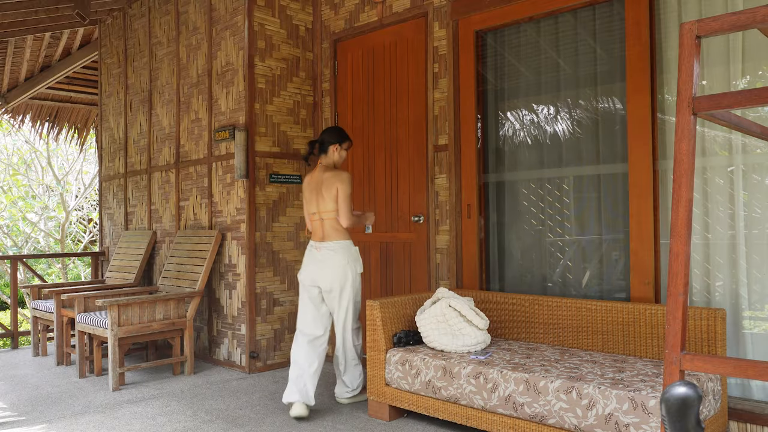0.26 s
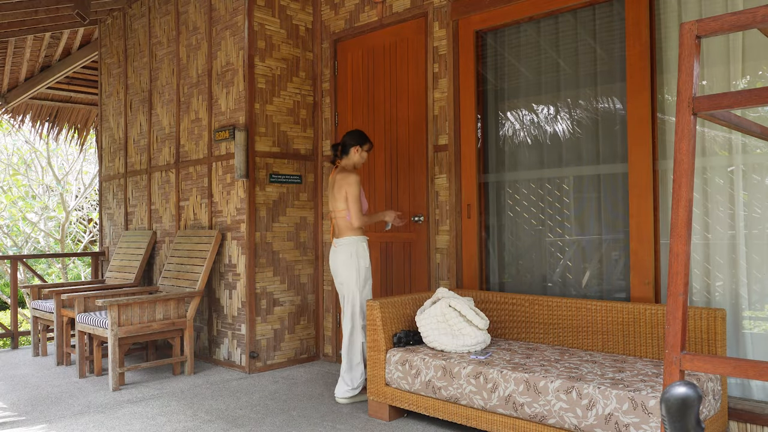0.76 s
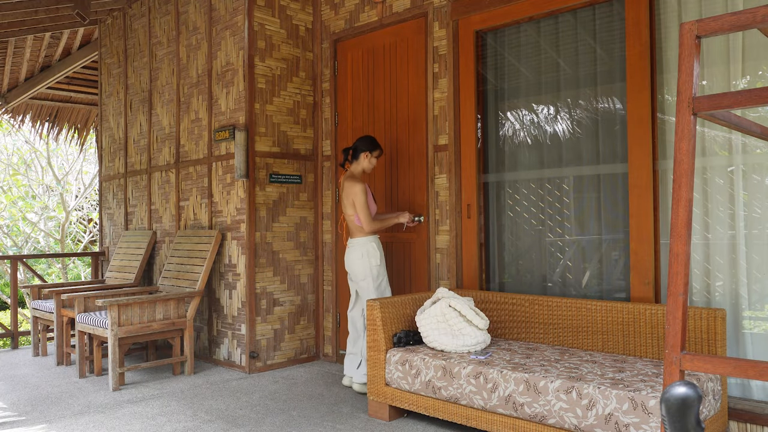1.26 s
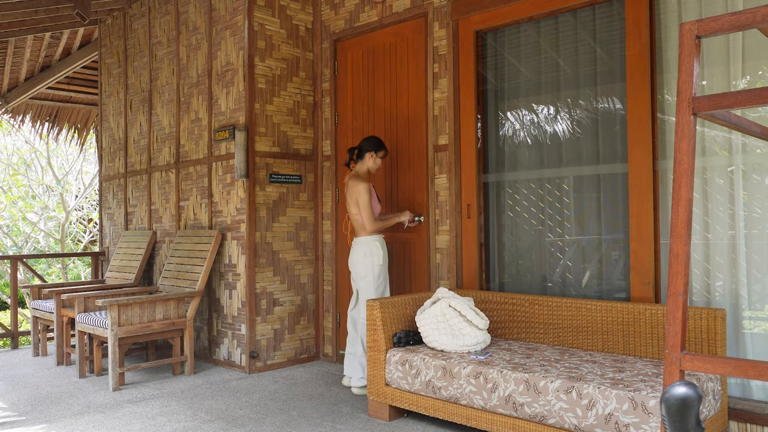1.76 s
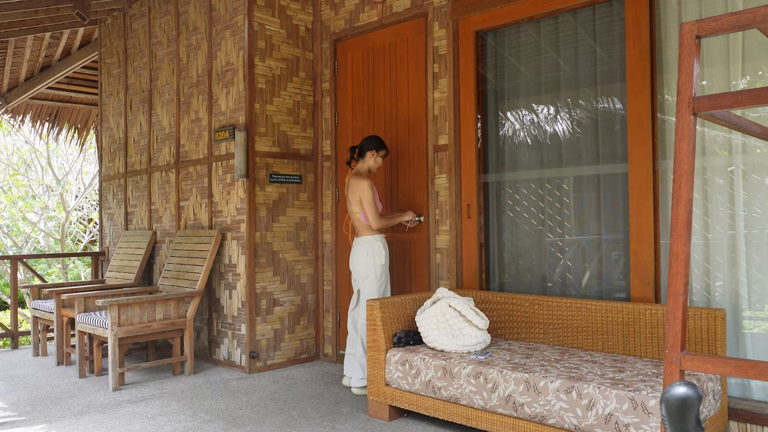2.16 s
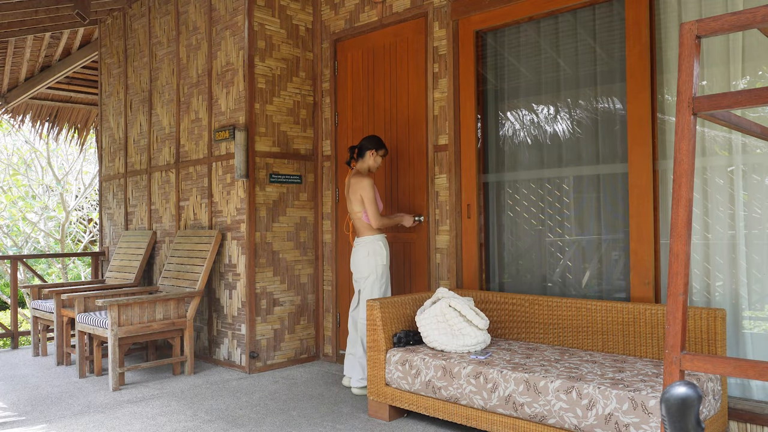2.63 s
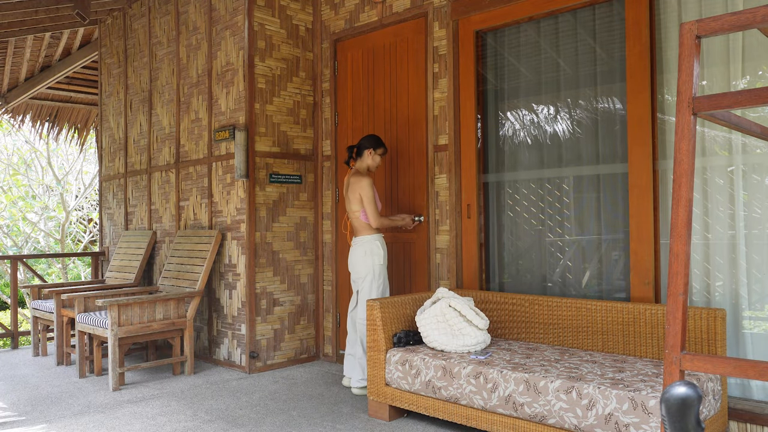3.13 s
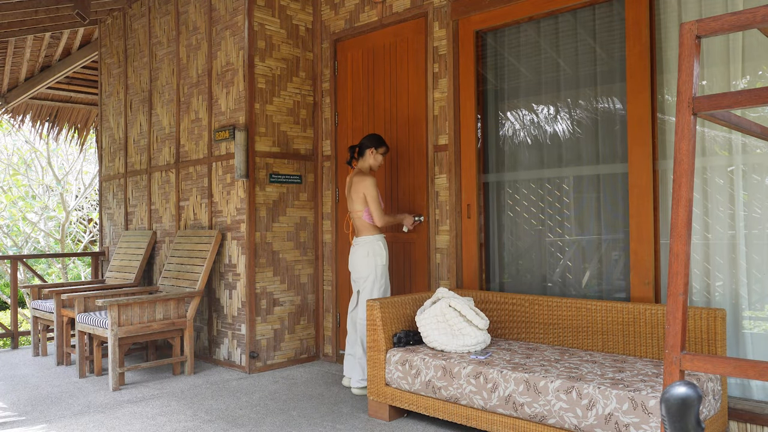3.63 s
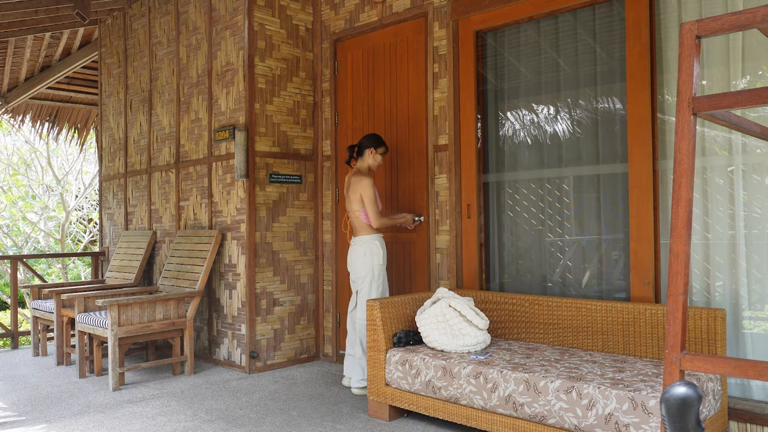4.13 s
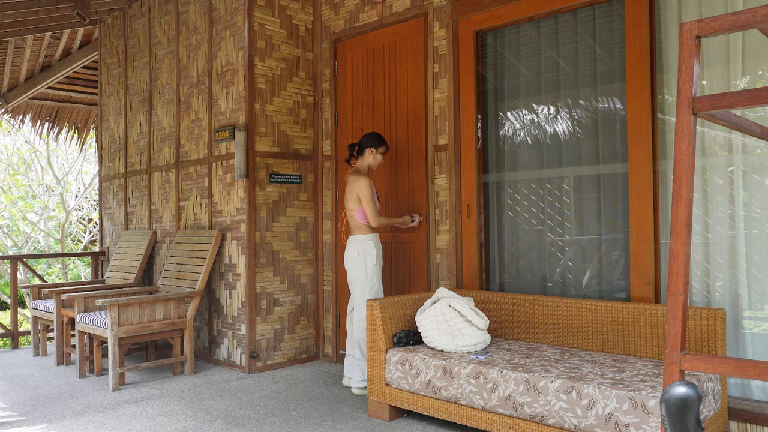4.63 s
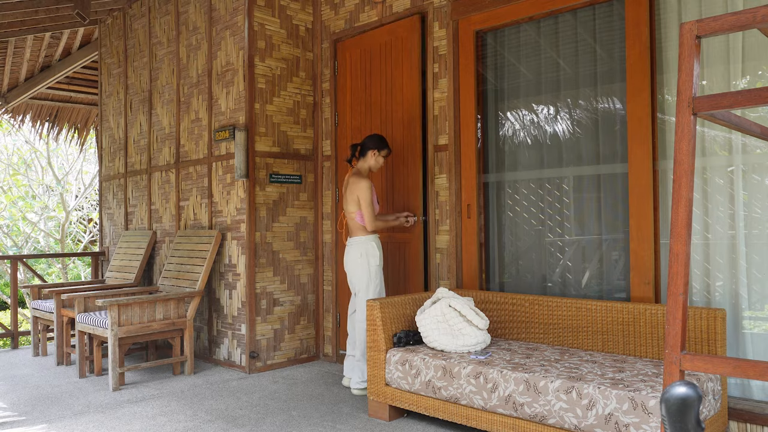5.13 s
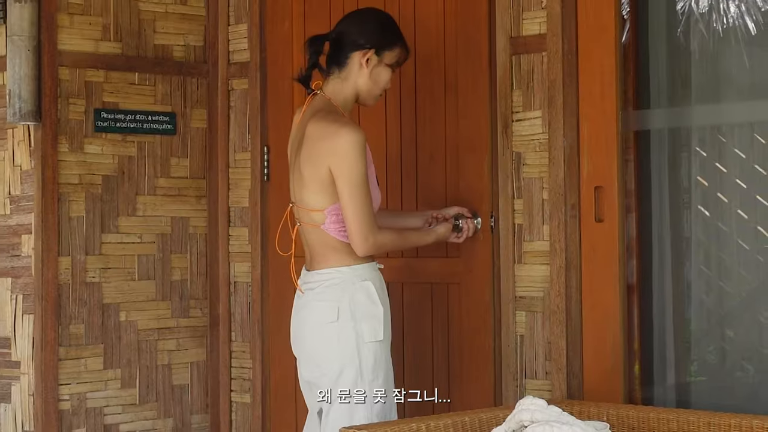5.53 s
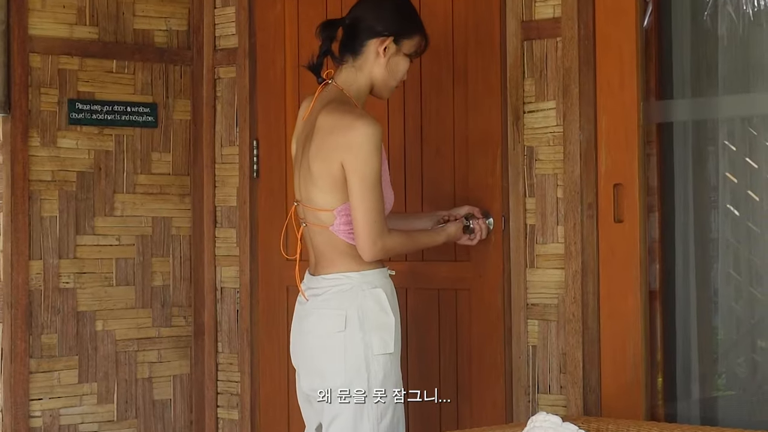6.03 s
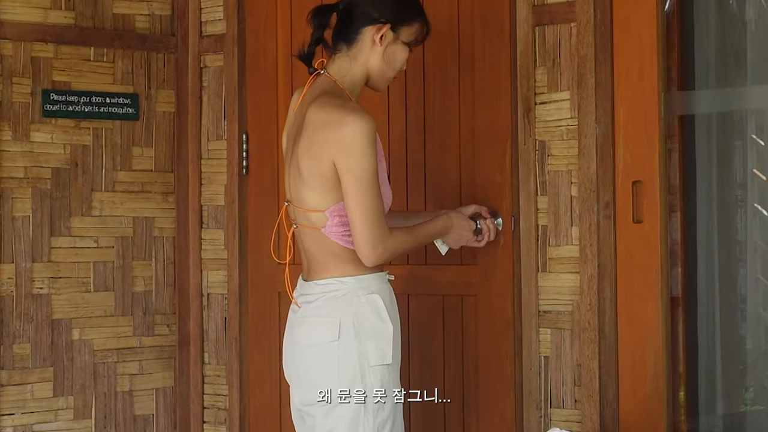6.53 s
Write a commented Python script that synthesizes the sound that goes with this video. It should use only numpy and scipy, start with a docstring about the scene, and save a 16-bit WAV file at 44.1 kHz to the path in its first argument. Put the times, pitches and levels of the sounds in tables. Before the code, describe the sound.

Light shuffling steps approach a door, with a tiny tinkle of keys over faint leafy air and a slowing far motor. Small metallic clicks and scrapes follow, with brief high squeaks and two hard latch snaps. After a quieter pause, the door is pulled to with a woody bang and quick weakening rattles, then a last squeak and clicks. Porch acoustics, short tail, microphone a few steps away, sources centred.

```python
"""A soft outdoor wash and a fading far motor are heard first, then soles shuffling up to a door on a roofed porch.
Keys jingle and a small bird whistles; a key clicks, grates and squeaks in a knob lock, and the latch snaps.
The door is pulled shut and bounces in its frame. Friction is filtered noise, blows are impulse trains
that excite damped modes, squeaks are stick-slip tones, and close walls answer with echoes and a short tail."""
import sys
import numpy as np
from scipy import signal
from scipy.fft import rfft, irfft
from scipy.io import wavfile
from scipy.ndimage import uniform_filter1d

SR = 44100
rng = np.random.default_rng(int(sys.argv[2]) if len(sys.argv) > 2 else 0)


def wrap_up_sound(samples):
    """Save the sound to the file named by the first command line argument, as 16-bit audio."""
    columns = np.atleast_2d(samples).T
    # keep every value between -1 and 1, then stretch to whole-number steps
    tamed = np.clip(columns, -1, 1)
    steps = np.round(tamed * 32767).astype(np.int16)
    wavfile.write(sys.argv[1], SR, steps)


N = 298909
RING = SR // 2  # samples in one struck response
T = np.arange(RING) / SR

# Outdoor wash, spectrum before a slight treble tilt: frequency_hz, level_db
AIR_SPECTRUM = [(15, -50), (25, -53), (82, -17.5), (249, -14), (516, -11), (714, -3), (775, -4.5),
                (887, -3.5), (962, -3), (1440, -1.5), (2480, -3.5), (4250, -6), (9840, -20), (11900, -25),
                (16000, -28)]
# Rising bird whistles: start_s, first_pitch_hz, level_db
WHISTLES = [(1.652, 4280, -60.5), (2.184, 5280, -59.5), (3.327, 4150, -60.5), (3.66, 4120, -55.5),
            (4.261, 5300, -63.5)]
# Soles brushing the floor: start_s, length_s, level_db, brightness_db
SCUFFS = [(.1, 0.1, -50.5, 6.5), (.228, 0.11, -45.5, 1), (.55, 0.1, -48, 1), (.628, 0.078, -47.5, 6),
          (.75, 0.083, -45, 5), (1.251, 0.089, -49, -3)]
# Loose keys touching: start_s, pitch_hz, level_db
KEY_TINKS = [(.47, 11700, -64), (0.487, 3860, -50.5), (1.332, 10580, -58), (1.339, 5880, -50.5),
             (1.362, 10600, -57), (1.656, 11600, -64), (1.777, 10100, -64), (3.258, 11720, -55.5)]
# Key and latch grating in the lock: start_s, length_s, level_db, brightness_db
KEY_SLIDES = [(1.93, 0.14, -55.5, 6), (2.585, 0.026, -44, -11), (3.53, 0.044, -48, 1),
              (3.926, .036, -43.5, 3), (4.498, 0.064, -39.5, -0.5), (5.68, 0.073, -51.5, -12),
              (6.28, 0.021, -47.5, 0.5), (6.345, .035, -52, 1)]
# Dry metal slipping: start_s, length_s, settled_pitch_hz, level_db, dying_away_db, first_roughness (0-1)
SQUEAKS = [(2.628, .014, 3920, -48, -4, 0), (2.646, 0.028, 2780, -27.5, 12, 0.43),
           (3.57, 0.055, 2838, -23, 14.5, .3), (4.562, 0.017, 3090, -23.5, 11, 0.45),
           (6.358, 0.027, 2680, -44.5, 4, 0), (6.39, .07, 2810, -25, 10, 0.01)]
# Key and knob clicking in the lock: start_s, level_db, door_panel_share_db, brightness_db
CLICKS = [(2.003, -49, 4, 26), (2.027, -46.5, 9, 17.5), (2.048, -37.5, 11, 11), (2.375, -48.5, -4, 5),
          (2.516, -40.5, 5, 2), (2.671, -34.5, -5, 4), (2.733, -40, -0.5, -16), (3.495, -49.5, -7, 7.5),
          (3.632, -36, -5, 0), (3.695, -38, -1, 2), (4.385, -46, 1, 2.5), (4.43, -46.5, -23, -3),
          (4.583, -36.5, 1.5, 4.5), (4.635, -41.5, 3, -3), (4.845, -45.5, 1, -2), (4.99, -35.5, -5, 0),
          (5.032, -41.5, 3, 3.5), (6.189, -45, 9, -12), (6.503, -37.5, -4, 3), (6.671, -34.5, -5.5, 0),
          (6.714, -35.5, -4.5, -13), (6.765, -40, 1, 0)]
# Sprung latch snapping:
# start_s, level_db, door_panel_share_db, brightness_db, rebound_db, plate_ring_db
SNAPS = [(2.983, -21.5, -5, 2.5, -5.5, -7), (3.961, -24, -8, 0.5, -8, -11),
         (5.5413, -24, 1.5, 2.5, -34, -24), (5.756, -23, 6, 1.5, -11, -15)]
# Door against its frame: start_s, level_db, brightness_db
KNOCKS = [(5.7437, -16.5, 4.5), (5.837, -20.5, -5), (5.919, -20.5, -6), (5.973, -34.5, -9)]
# Undamped ring of the lock (the hand halves t60): frequency_hz, level_db, t60_s
LOCK_MODES = [(1254, -22, 0.073), (1599, -19, 0.45), (1860, -16, 0.56), (2250, -5, 0.033),
              (2430, -18.5, 0.051), (3130, 2, 0.3), (2820, -16, 0.04), (3490, 12, 0.13), (3423, 32, 0.056),
              (3600, -30, .11), (4230, -34, 0.066), (5100, 0, 0.1), (5500, 27, 0.091), (6560, -39, .17),
              (6850, -5, 0.038), (6950, -14, 0.4)]
# Ring of the latch plate: frequency_hz, level_db, t60_s
PLATE_MODES = [(941, -15, .08), (1102, -5, 0.052), (1218, -5, .08), (1550, -4, .06), (1933, -1, 0.092)]
# Undamped ring of the door (the hand halves t60): frequency_hz, level_db, t60_s
DOOR_MODES = [(150, -18, .6), (223, -7.5, 0.96), (350, -18, 0.4), (640, -23, 0.15), (735, 7.5, 0.43),
              (770, -4.5, 0.66), (836, 9, 0.27), (1022, 14.5, 0.13), (1200, 4, 0.33), (1410, -14, 0.17),
              (1550, -4, 0.27), (1600, 6.5, 0.23), (1680, 11, 0.093), (2110, -19, 0.22), (2340, -17, .15),
              (2670, -20, .2), (3200, -17, .18)]
# Broad colour of contacts in the lock: frequency_hz, level_db
LOCK_COLOUR = [(60, -52), (200, -64), (450, -17.5), (780, -10), (1100, -5.5), (1900, 0.5), (3100, 2),
               (4800, -4), (7500, -12.5), (9500, -23.5), (12500, -32), (16000, -72)]
# Broad colour of contacts on the door: frequency_hz, level_db
DOOR_COLOUR = [(25, -35), (70, -33), (150, -54), (350, -8.5), (900, -2), (1700, 3.5), (3000, -1.5),
               (4500, -11.5), (7500, -24.5), (10000, -42), (16000, -62)]
# Broad colour of soles on the floor: frequency_hz, level_db
SOLE_COLOUR = [(100, -40), (500, -16), (1000, 3.5), (2000, -0.5), (4200, 6), (6500, 0.5), (9000, -8),
               (12000, -15), (16000, -34)]
# Echoes of door, wall, floor and roof, delays varied a little each time: delay_s, gain
ECHOES = [(.0031, 0.79), (.0062, 0.95), (.0112, 0.35)]
# Stereo width, a filter on the side signal: frequency_hz, gain_db
SIDE_WIDTH = [(100, -35), (300, -12), (700, -10.5), (1400, -9.5), (2800, -7), (5600, -3), (12000, -1)]

AIR_DB, AIR_FALL_DB_PER_S, AIR_TREBLE_DB = -52, 0.6, -0.5
# The far motor slows and fades
MOTOR_FIRST_HZ, MOTOR_LAST_HZ, MOTOR_SLOWING_S, HUM_DB, HUM_FALL_DB_PER_S = 130, 88, 2.3, -80, 2
# Its road noise fades down to a faint rest and swells once on the way
ROAD_FIRST_DB, ROAD_FALL_DB_PER_S, ROAD_REST_DB = -57.5, 4.5, -74.5
SWELL_AT_S, SWELL_S, SWELL_DB = 1.14, .33, 8.5
WHISTLE_S, WHISTLE_RISE = .185, 1.23  # length; last pitch over first
JOSTLE_S = 0.0064
# Each slip starts a little sharp, settles, and frays at a steady rate
SLIP_ATTACK_S, SLIP_RELEASE_S, SLIP_SHARP, SLIP_SETTLE_S, FRAY_PER_S = 0.0046, 0.0027, 0.042, 0.006, 8.2
CLICK_RATTLE_S = 0.0041
# The key scrapes briefly as it takes up the slack before each click
SLACK_LEAD_S, SLACK_S, SLACK_DB = .007, 0.013, -7.5
# Faint ticks while the key is in the lock
FIDDLE_FROM_S, FIDDLE_TO_S, FIDDLE_COUNT, FIDDLE_DB = 1.95, 4.5, 7, -55
# The bolt lets go just before it lands, then rebounds and rattles
RELEASE_LEAD_S, RELEASE_DB, RELEASE_BRIGHT_DB, RELEASE_RATTLE_S = .0033, -4, 7, 0.0025
SNAP_RATTLE_S, REBOUND_S, REBOUND_RATTLE_S, REBOUND_BODY_DB = 0.0041, 0.021, 0.0065, 7
KNOCK_BODY_DB, KNOCK_RATTLE_S = -5, 0.0019
# On each rebound the leaf first grazes the latch with a woodier touch
GRAZE_LEAD_S, GRAZE_DB, GRAZE_BODY_DB, GRAZE_RATTLE_S = .023, -10, 9, 0.0043
# The loose leaf chatters between the knocks, ever more weakly
CHATTER_AT_S, CHATTER_S, CHATTER_DECAY_S = 5.788, .18, .14
CHATTER_PER_S, CHATTER_DB, CHATTER_BODY_DB = 500, -26, 9
TOP_HZ = 15850


def undb(db):
    """Decibels are logarithmic; this returns the amplitude gain."""
    return 10 ** (np.asarray(db) / 20)


def unit(x):
    """Normalization: scale to a total energy of one."""
    return x / np.sqrt(np.sum(x ** 2) + 1e-18)


def fade(t60):
    """Exponential damping: amplitude falls 60 dB in t60 seconds."""
    return np.exp(-np.log(1000) * T / t60)


def walk(count, rate):
    """Smoothed random fluctuation with a spread near one."""
    step = max(int(SR / rate), 1)
    held = np.repeat(rng.standard_normal(count // step + 1), step)
    return uniform_filter1d(held, step)[:count]


def colour(x, points, body_db=0, bright_db=0):
    """Minimum-phase filtering through (Hz, dB) points, with a low body shelf and a treble slope."""
    size = 4096
    hz = np.maximum(np.arange(size // 2 + 1) * SR / size, 1)
    point_hz, point_db = np.transpose(points)
    db = np.interp(np.log(hz), np.log(point_hz), point_db)
    db = db + body_db / (1 + (hz / 1500) ** 4)
    db = db + bright_db * np.log10(1 + (hz / 4200) ** 4)
    # Folding the cepstrum onto positive time makes the filter causal
    cepstrum = irfft(np.log(undb(db)))
    cepstrum[1:size // 2] *= 2
    cepstrum[size // 2 + 1:] = 0
    response = irfft(np.exp(rfft(cepstrum)))
    return signal.fftconvolve(x, response)[:len(x)]


def ring(modes):
    """Modal superposition: damped modes, struck at a slightly different place each time."""
    total = np.zeros(RING)
    for hz, db, t60 in modes:
        gain = undb(db + 1.14 * rng.standard_normal()) * rng.choice([-1, 1])
        total += gain * fade(t60) * np.cos(2 * np.pi * hz * T)
    return unit(total)


def porch(x, near_db=1, near_t60=0.31, far_db=-9, far_t60=0.28, side_db=-7):
    """Room response: direct sound and three echoes in mid; scatter and a short tail in mid and side."""
    near, far = (1 - np.exp(-T / 0.0013)) * rng.standard_normal((2, 2, RING))
    mid, side = (undb(near_db) * unit(a * fade(near_t60)) + undb(far_db) * unit(b * fade(far_t60))
                 for a, b in zip(near, far))
    mid[0] += 1  # direct sound
    for delay, gain in ECHOES:
        mid[int(delay * SR * (1 + .04 * rng.standard_normal()))] += gain
    size = np.sqrt(np.sum(side ** 2) / np.sum(mid ** 2))
    ahead = unit(signal.fftconvolve(x, mid))
    around = undb(side_db) * size * unit(signal.fftconvolve(x, side))
    return np.array([ahead, around])


def add(out, s, x):
    """Linear superposition: mix x in at time s."""
    i = max(int(s * SR), 0)
    out[:, i:i + x.shape[1]] += x[:, :max(N - i, 0)]


def blow(db):
    """Impulse scaling: the energy, spread over 20 ms, has this level."""
    return undb(db) * np.sqrt(SR / 50)


def contact(rattle_s, bounce_db=0, rate=900):
    """Repeated impact: a first touch and a rattle that outweighs it more the longer it lasts."""
    rattle_s = max(rattle_s, .001)
    impacts = (rng.random(RING) < rate / SR) * rng.choice([-1, 1], RING)
    bounces = impacts * np.exp(-T / rattle_s) * (1 - np.exp(-2 * T / rattle_s))
    push = undb(bounce_db) * np.sqrt(rattle_s / 0.014) * unit(bounces)
    push[0] += 1
    return push


def strike(push, points, modes, body_db, bright_db, ring_db, dense_db, dense_t60):
    """Forced vibration: impacts crack, joined parts buzz, and modes ring, damped by the hand on the knob."""
    buzz = unit(rng.standard_normal(RING) * fade(dense_t60))
    crack = colour(unit(push) + undb(dense_db) * buzz, points)
    damped = [(hz, db, t60 / 2) for hz, db, t60 in modes]
    rung = signal.fftconvolve(push, ring(damped))[:RING]
    both = unit(crack) + undb(ring_db) * unit(rung)
    return unit(colour(both, [(1, 0)], body_db, bright_db))  # shelf and slope only


def panel(t60, top_hz):
    """Diffuse plate vibration: the door leaf and the light wall hum on after a blow."""
    hum = rng.standard_normal(RING) * fade(t60) * (1 - np.exp(-T / 0.013))
    points = [(25, -32), (45, -25), (75, -11), (160, -4), (top_hz, 0), (1300, -10), (4000, -45), (12000, -80)]
    return unit(colour(hum, points))


def rub(strokes, points, grain_db):
    """Sliding friction: one surface drags over the fine grain of another."""
    out = np.zeros((2, N))
    for s, length, db, bright_db in strokes:
        count = int(length * SR)
        grain = undb(grain_db * walk(count, 500))
        grit = rng.standard_normal(count) * grain * signal.windows.tukey(count, .5)
        add(out, s, undb(db) * np.sqrt(count) * porch(colour(grit, points, 0, bright_db), side_db=-2.5))
    return out


def lock_hit(db, body_db, bright_db, rattle_s, panel_db=-29):
    """Coupled vibration: a blow on the lock housing makes the door panel hum with it."""
    push = contact(rattle_s, bounce_db=10.5, rate=4000)
    hit = strike(push, LOCK_COLOUR, LOCK_MODES, body_db, bright_db,
                 ring_db=-13, dense_db=-14.5, dense_t60=0.033)
    sound = hit + undb(panel_db + body_db) * panel(t60=0.6, top_hz=505)
    return blow(db) * porch(sound, near_db=2.5, near_t60=0.18, far_db=-4.5, far_t60=0.35, side_db=-5.5)


def door_hit(push, db, body_db, bright_db, panel_db):
    """Plate excitation: impacts strike the door leaf; leaf and wall rumble on."""
    hit = strike(push, DOOR_COLOUR, DOOR_MODES, body_db, bright_db,
                 ring_db=-7.0, dense_db=-9.0, dense_t60=0.18)
    sound = hit + undb(panel_db) * panel(t60=0.33, top_hz=670)
    return blow(db) * porch(sound, near_db=2.5, near_t60=0.064, far_db=-4.5, far_t60=0.25, side_db=-9)


def outdoors(road_hz=770):
    """Broadband and periodic sources: a sinking wash of leaves and distance; a far motor and its road noise."""
    t = np.arange(N) / SR
    gain = undb(AIR_DB - AIR_FALL_DB_PER_S * t + 0.1 * walk(N, 24)) * np.sqrt(N)
    noises = [unit(colour(rng.standard_normal(N), AIR_SPECTRUM, 0, AIR_TREBLE_DB)) for _ in range(2)]
    wash = gain * np.array(noises)

    road_db = np.maximum(ROAD_FIRST_DB - ROAD_FALL_DB_PER_S * t, ROAD_REST_DB)
    road_db = road_db + SWELL_DB * np.exp(-((t - SWELL_AT_S) / SWELL_S) ** 2)
    road_points = [(60, -35), (130, -9), (200, -9), (260, 1), (330, -12), (600, -8), (road_hz, 4),
                   (950, -2), (1300, -1), (3000, -12), (8000, -40)]
    road = undb(road_db) * np.sqrt(N) * unit(colour(rng.standard_normal(N), road_points))

    hz = MOTOR_LAST_HZ + (MOTOR_FIRST_HZ - MOTOR_LAST_HZ) * np.exp(-t / MOTOR_SLOWING_S)
    phase = 2 * np.pi * np.cumsum(hz * (1 + 0.029 * walk(N, 25.15))) / SR
    hum = undb(HUM_DB - HUM_FALL_DB_PER_S * t + walk(N, 31)) * np.sin(phase)
    wash[0] += road + hum  # mid only
    return wash


def bird():
    """Frequency modulation: thin buzzy upward slurs level off, blurred by the trees."""
    out = np.zeros((2, N))
    u = np.linspace(0, 1, int(WHISTLE_S * SR))
    for s, first_hz, db in WHISTLES:
        slur = WHISTLE_RISE + (1 - WHISTLE_RISE) * (1 - u) ** 2
        hz = first_hz * slur * (1 + .045 * walk(len(u), 1200))  # the fast wobble is the buzz
        call = np.sin(2 * np.pi * np.cumsum(hz) / SR) * signal.windows.tukey(len(u), .3)
        add(out, s, undb(db) * np.sqrt(len(u)) * porch(call, far_db=-9, far_t60=1.0, side_db=2))
    return out


def steps():
    """Granular friction: soles drag over fine grit."""
    return rub(SCUFFS, SOLE_COLOUR, grain_db=4)


def keys(t60=0.048, tick_db=-7):
    """Friction and modal ringing: the key grates in the lock; those hanging from it jostle and ring faintly."""
    out = rub(KEY_SLIDES, LOCK_COLOUR, grain_db=5)
    for s, hz, db in KEY_TINKS:
        modes = [(hz, 0, t60), (hz * 0.83, -3, t60), (hz * 0.69, -11, t60)]
        tick_noise = rng.standard_normal(RING) * fade(0.0071)
        tick = unit(colour(tick_noise, [(hz / 4, -25), (hz, 0), (2 * hz, -18)]))
        response = ring(modes) + undb(tick_db) * tick
        jingle = signal.fftconvolve(contact(JOSTLE_S, bounce_db=1), response)[:RING]
        add(out, s, blow(db) * porch(unit(jingle)))
    return out


def squeaks(jitter=0.037, half_db=-3, grit_db=-7, overtones_db=(0, -19, -29, -39),
            tick_db=2, tick_lag_s=0.0055, flutter_db=2.0):
    """Stick-slip: a whistle doubles its period and frays into grit; a rough one breaks loose with a thin tick."""
    out = np.zeros((2, N))
    for s, length, pitch_hz, level_db, dying_db, first_rough in SQUEAKS:
        t = np.arange(0, length, 1 / SR)
        rough = np.clip(first_rough + FRAY_PER_S * t, 0, 1)
        gain = undb(level_db - dying_db * t / length + flutter_db * walk(len(t), 170))
        gain = gain * np.minimum(t / SLIP_ATTACK_S, 1) * np.minimum((length - t) / SLIP_RELEASE_S, 1)

        hz = pitch_hz * (1 + SLIP_SHARP * np.exp(-t / SLIP_SETTLE_S))
        hz = hz * (1 + (0.02 + jitter * rough) * walk(len(t), 1500))
        phase = 2 * np.pi * np.cumsum(hz) / SR
        tone = sum(undb(db) * np.sin((k + 1) * phase) for k, db in enumerate(overtones_db))
        # Partials at multiples of half the pitch: the doubled period
        halves = .2 * np.sin(phase / 2) + np.sin(3 * phase / 2)
        halves = halves + .8 * np.sin(2 * phase) + .4 * np.sin(5 * phase / 2)
        grit = unit(colour(rng.standard_normal(len(t)), LOCK_COLOUR, -13, 0.67)) * np.sqrt(len(t))

        slip = gain * (tone + undb(half_db) * rough ** 2 * halves + undb(grit_db) * rough * grit)
        heard = porch(slip, near_db=6.5, near_t60=0.028, far_db=2.5, far_t60=0.24)
        add(out, s, heard * np.sqrt(np.sum(gain ** 2)))
        tick = lock_hit(level_db + tick_db, body_db=-23, bright_db=2, rattle_s=.0025)
        add(out, s + tick_lag_s, first_rough * tick)
    return out


def lock():
    """Friction, then impact: pins and key take up slack and click in the housing, with faint ticks as well."""
    slack = [(s - SLACK_LEAD_S, SLACK_S, db + SLACK_DB, bright_db) for s, db, _, bright_db in CLICKS]
    out = rub(slack, LOCK_COLOUR, grain_db=1)
    for s, db, body_db, bright_db in CLICKS:
        add(out, s, lock_hit(db, body_db, bright_db, CLICK_RATTLE_S))
    for s in rng.uniform(FIDDLE_FROM_S, FIDDLE_TO_S, FIDDLE_COUNT):
        add(out, s, lock_hit(FIDDLE_DB, body_db=-1, bright_db=10, rattle_s=CLICK_RATTLE_S))
    return out


def latch():
    """Spring release and impact: a bright tick, the bolt's blow ringing its plate, and a woodier rebound."""
    out = np.zeros((2, N))
    for s, db, body_db, bright_db, rebound_db, plate_db in SNAPS:
        release = lock_hit(db + RELEASE_DB, body_db, bright_db + RELEASE_BRIGHT_DB, RELEASE_RATTLE_S)
        landing = lock_hit(db, body_db, bright_db, SNAP_RATTLE_S)
        plate = porch(ring(PLATE_MODES), near_db=2.5, near_t60=0.17, far_db=2, far_t60=0.27)
        rebound = lock_hit(db + rebound_db, body_db + REBOUND_BODY_DB, bright_db, REBOUND_RATTLE_S)
        add(out, s - RELEASE_LEAD_S, release)
        add(out, s, landing)
        add(out, s, blow(db + plate_db) * plate)
        add(out, s + REBOUND_S, rebound)
    return out


def door():
    """Successive collisions: the leaf meets the frame, bounces on the latch and chatters between the knocks."""
    out = np.zeros((2, N))
    for s, db, bright_db in KNOCKS:
        push = contact(KNOCK_RATTLE_S, bounce_db=9, rate=3000)
        add(out, s, door_hit(push, db, KNOCK_BODY_DB, bright_db, panel_db=-18))
    for s, db, _ in KNOCKS[1:]:
        push = contact(GRAZE_RATTLE_S, bounce_db=5, rate=2400)
        graze = door_hit(push, db + GRAZE_DB, GRAZE_BODY_DB, bright_db=1, panel_db=-3.5)
        add(out, s - GRAZE_LEAD_S, graze)
    impacts = (rng.random(RING) < CHATTER_PER_S / SR) * rng.standard_normal(RING)
    chatter = impacts * np.exp(-T / CHATTER_DECAY_S) * (T < CHATTER_S)
    add(out, CHATTER_AT_S, door_hit(chatter, CHATTER_DB, CHATTER_BODY_DB, bright_db=3, panel_db=-7))
    return out


def scene():
    """Mid-side stereo: all sources are nearly straight ahead; mainly the treble spreads."""
    mid, side = outdoors() + bird() + steps() + keys() + squeaks() + lock() + latch() + door()
    side = colour(side, SIDE_WIDTH)
    left = (mid + side) * undb(-0.92)
    right = (mid - side) * undb(-0.67)
    return np.array([left, right])


def record(dry):
    """Band limitation: a steep elliptic low-pass cuts the top."""
    low_pass = signal.ellip(10, .2, 70, TOP_HZ, fs=SR, output="sos")
    return signal.sosfilt(low_pass, dry)


dry = scene()
out = record(dry)
wrap_up_sound(out)
```